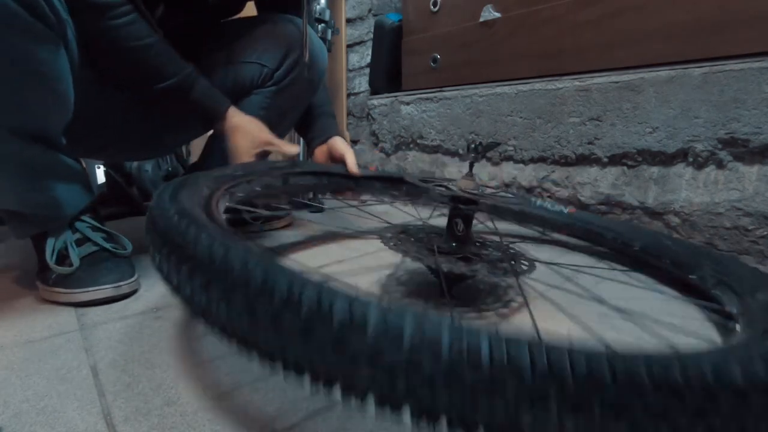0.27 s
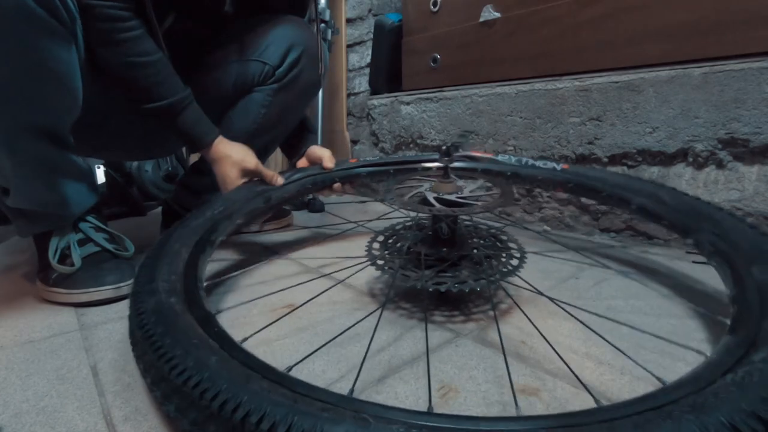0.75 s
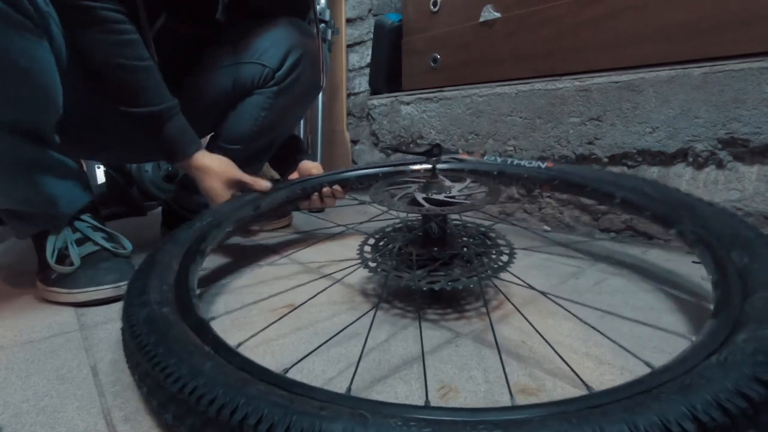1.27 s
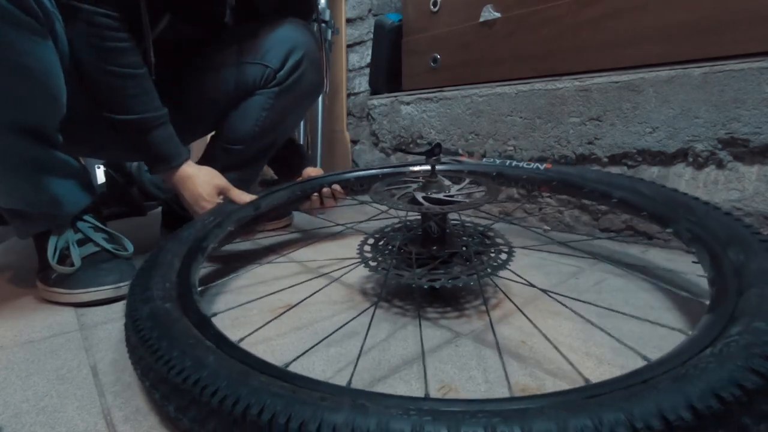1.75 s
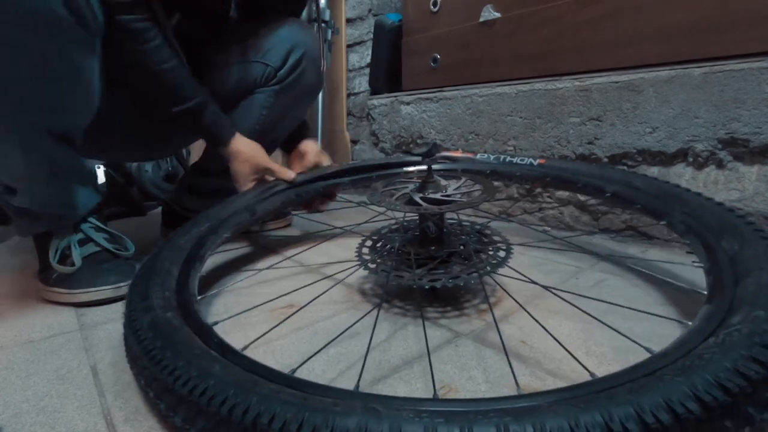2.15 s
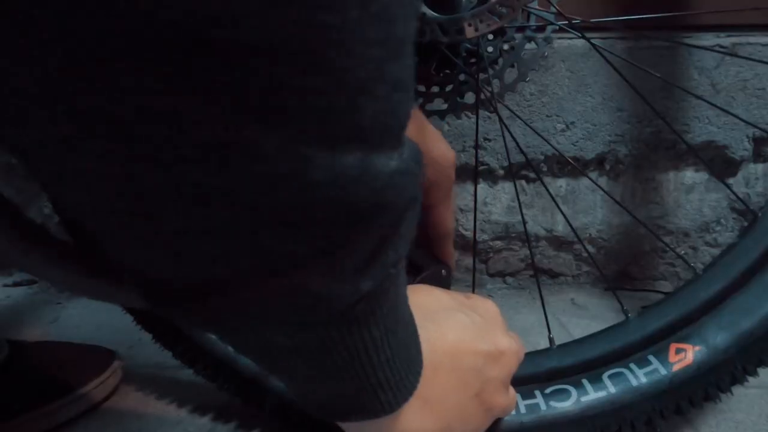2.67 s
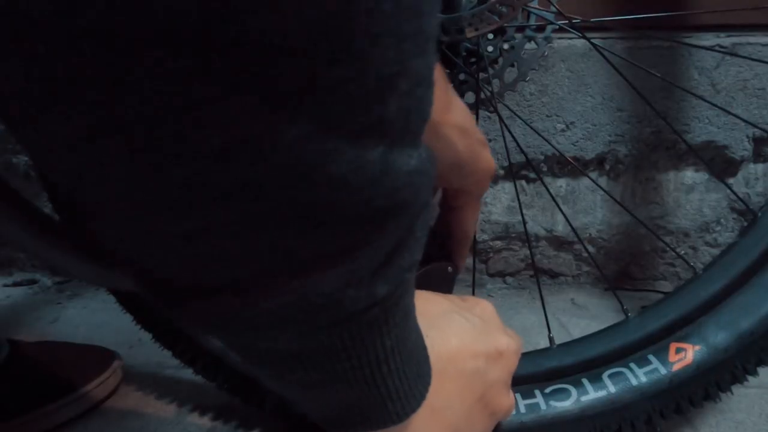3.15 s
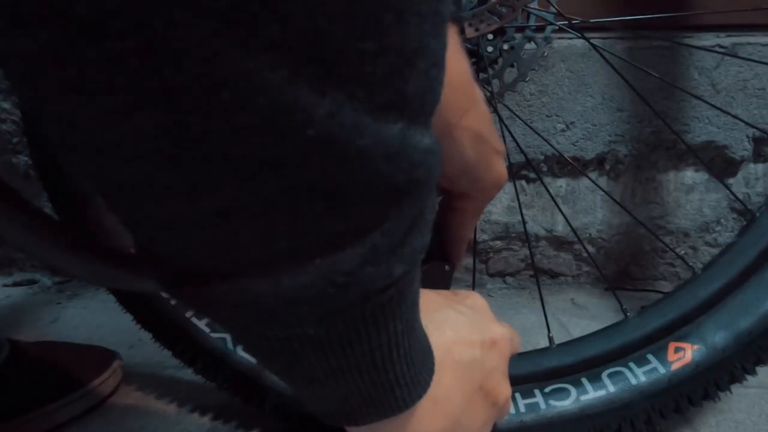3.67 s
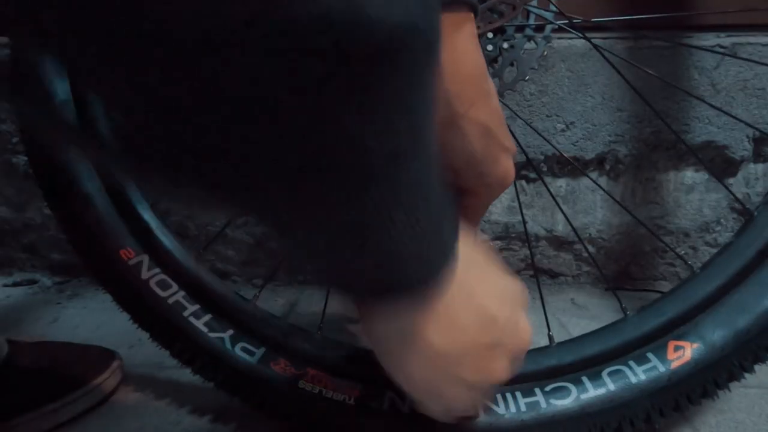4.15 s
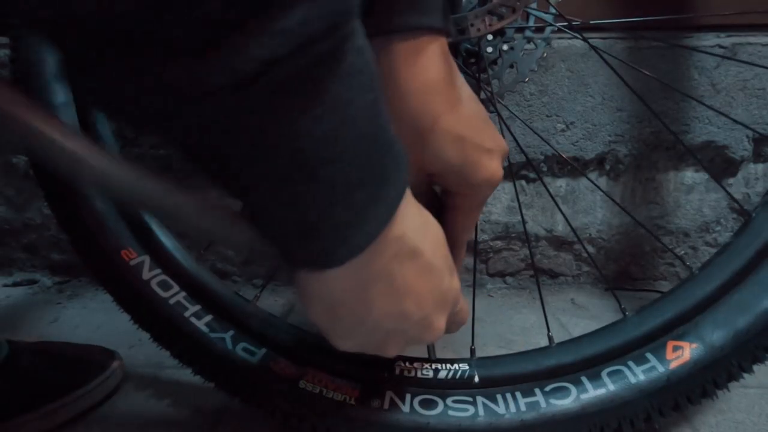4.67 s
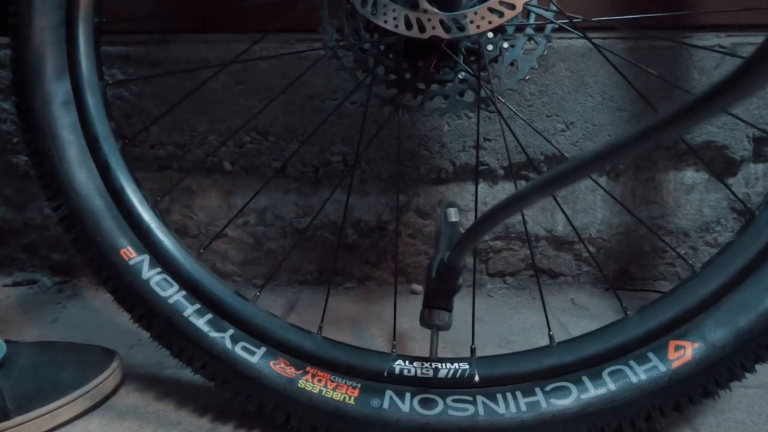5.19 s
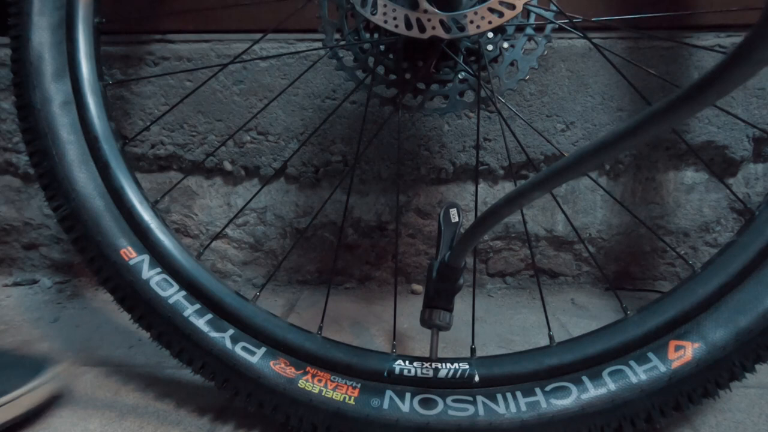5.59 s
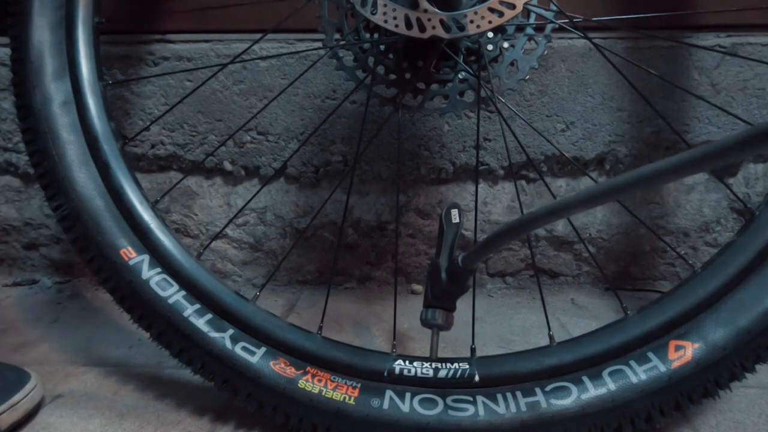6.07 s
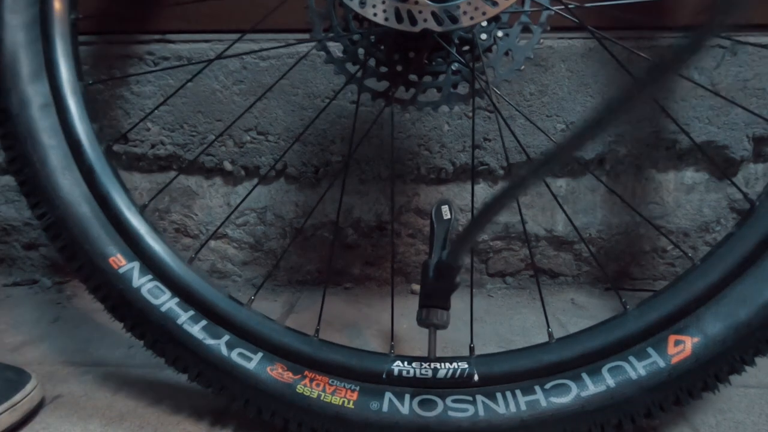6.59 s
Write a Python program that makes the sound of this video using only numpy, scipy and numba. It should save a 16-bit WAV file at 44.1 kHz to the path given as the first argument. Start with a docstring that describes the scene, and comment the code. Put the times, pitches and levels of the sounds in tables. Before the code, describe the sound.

Close up in a quiet, hard-walled corner, hands softly rub a bicycle tyre while its bead creaks in jerks over the rim. A thumb squeaks briefly on rubber. Small dry valve clicks follow in a quick uneven run, then a spoke faintly rings. Finally a hand pump clatters with hollow knocks, air rushes and sliding, ending in a short seal squeak.

```python
"""Low by a stone wall on a tiled floor, two close microphones on a bicycle tyre being worked onto its rim.
First faint room air and hands rubbing rubber: noise of small catches; the bead creaks in jerks, low thumps sag.
A thumb squeaks by stick and slip; then the valve fitting clicks on paired modes and a touched spoke rings.
Last the hand pump: speed-driven air and sliding noise, knocks on shell and barrel with low thumps under them,
and squeaks of its seal."""
import sys
import numpy as np
from scipy import signal
from scipy.fft import rfft, irfft, next_fast_len
from scipy.io import wavfile
from scipy.ndimage import uniform_filter1d
from numba import njit

SR = 44100
rng = np.random.default_rng(int(sys.argv[2]) if len(sys.argv) > 2 else 0)


def to_wav(s):
    """Save 16-bit WAV."""
    ch = np.atleast_2d(s).T  # columns
    pcm = np.round(np.clip(ch, -1, 1) * 32767)  # PCM
    wavfile.write(sys.argv[1], SR, pcm.astype(np.int16))


N = 301203
TIME = np.arange(N) / SR

# reflections off floor and walls: delay_s, level_db
ECHOES = [(.0028, -22.5), (.009, -25), (0.027, -29)]
# treble response of the recorder: freq_hz, gain_db
RECORDER_RESPONSE = [(10200, 0), (11500, -12), (15000, -18), (16000, -28)]
ROOM_T60_S = 0.14
TOP_HZ = 16000
SHADE_HZ = 600  # the recorder's body shades one side above about here

# spectrum of the still air: freq_hz, level_db
QUIET_SPECTRUM = [(20, 0), (45, 13), (90, -16), (155, 7), (260, 4), (700, 1.5), (2000, -15.5), (5000, -20),
                  (10000, -24.5), (15000, -16)]
# level of the faint low hum: time_s, level_db
HUM_LEVEL = [(1.9, -77), (2.3, -69), (4.0, -65), (4.6, -68)]
QUIET_DB, HUM_HZ = -70, 169.0

# a hand slides over the tyre: start_s, length_s, attack_s, scuff_db, hiss_db (dry), rumble_db (casing),
# spot_hz (rubbed spot, as the rub starts), ring_db (of the spot)
RUBS = [(0, 0.15, 0.064, -66, -56.5, -69, 1470, -80), (0.176, 0.078, 0.025, -65.5, -60.5, -89, 2800, -69),
        (0.248, 0.17, 0.041, -63, -57.5, -89, 360, -68.5), (0.512, 0.44, 0.12, -64, -61.5, -65, 1010, -62),
        (0.94, 0.11, 0.014, -74, -73.5, -92, 990, -74), (1.128, 0.2, 0.035, -66.5, -69, -69, 1400, -72),
        (1.326, 0.1, 0.02, -65.5, -63, -72, 454, -69), (1.632, 0.16, 0.032, -63.5, -71, -73, 1650, -70.5),
        (1.848, 0.091, 0.0053, -70, -97, -64.5, 380, -71), (1.906, 0.58, 0.13, -63.5, -62, -70, 1550, -72),
        (2.063, 0.052, 0.0084, -81, -51, -81, 1500, -64), (2.108, 0.068, 0.025, -75, -62, -58, 700, -59.5),
        (2.275, 0.07, 0.065, -61, -50.5, -60, 1500, -57), (2.458, 0.05, 0.0067, -57, -57, -48, 840, -60.5),
        (2.577, 0.091, 0.0038, -86, -57, -60, 860, -75), (2.811, 0.42, 0.0067, -91, -72, -67, 1390, -75),
        (3.41, 0.99, 0.027, -69, -75, -65.5, 836, -73.5), (4.195, 0.2, 0.017, -61.5, -63, -77, 1690, -66),
        (4.41, 0.19, 0.013, -65.5, -71, -69, 665, -70.5), (4.649, 0.18, 0.024, -57, -94, -70, 1290, -67)]
# the fingers hold the tyre: start_s, length_s
GRIPS = [(0, 0.56), (0.564, 1.74), (2.454, 0.313), (2.806, 1.93)]
# spectra of dry hiss, scuffing and casing rumble: freq_hz, level_db
HISS_SPECTRUM = [(900, -16), (2000, -3.5), (2900, 0), (5000, -9), (10000, -16), (11500, -18.5),
                 (15500, -14)]
SCUFF_SPECTRUM = [(180, -5), (350, 8), (480, -2.5), (750, 7), (1500, 4.5), (2200, 0), (3500, -35),
                  (8000, -65)]
CASING_SPECTRUM = [(20, -35), (50, -10), (95, -16), (135, 5.5), (160, 4), (200, -5.5), (270, -9),
                   (500, -19.5), (1200, -59)]
# resonances of the rubber: freq_hz, width_hz, gain_db
RUBBER = [(910, 800, 3.5), (2010, 890, 11), (2980, 300, -32), (4720, 590, -1)]
RUB_ATTACK_S, RUB_RELEASE_S = 0.0081, 0.02  # attack where none is listed
GRIP_SCUFF_DB, GRIP_HISS_DB, GRIP_RUMBLE_DB = -74, -78.5, -78.5  # fingers that only hold the tyre
PRESSURE_WAVER_DB, PRESSURE_WAVER_RATE_HZ = 1.3, 14
RUB_GLIDE_OCTAVES, RUB_OVERTONE = -0.24, 1.6  # pitch sinks along a rub; ratio of the upper resonance
GRIT_PER_S, GRIT_SPREAD_DB = 500, 2
TYRE_GRIT_DB, PUMP_GRIT_DB = -14, -10  # against the scuff and the sliding
SCUFF_FLUTTER_DB, RUMBLE_FLUTTER_DB, JET_FLUTTER_DB = 3, 3, 1.1

# single jerks of the bead; the last row is the dull part of a valve click: start_s, peak_db, fade_s
JERKS = [(0.133, -51, .004), (0.596, -39, 0.00076), (0.606, -31.5, 0.0013), (0.617, -49, .003),
         (1.201, -51, 0.013), (1.382, -48, 0.0022), (1.398, -49, .002), (1.422, -57, .003),
         (1.503, -57, 0.0018), (1.627, -47, 0.0039), (1.849, -50, 0.0036), (2.036, -45.5, 0.0012),
         (2.461, -49.5, 0.0015), (2.486, -48, 0.0036), (2.503, -49, 0.0018), (2.519, -50, .002),
         (2.835, -48, 0.00075)]
# the bead creaks over the rim in a run of jerks: time_s, rate_per_s, peak_db
CREAK = [(.683, 145, -41), (0.706, 65.6, -39.5), (0.748, 36.6, -35), (0.854, 41, -35), (.882, 75, -33),
         (0.933, 34.6, -40)]
# resonances of tyre wall and rim: freq_hz, width_hz, gain_db
BEAD = [(827, 150, 1), (982, 125, 3), (1180, 215, 3), (1500, 120, 0.5), (1850, 205, 1), (2175, 200, 0),
        (2350, 88, -2.5), (2770, 92, -10), (3550, 2800, -9)]
JERK_FADE_S = .005  # within the run

# low thumps, first of the pressed tyre, later under the knocks of the pump: # start_s, peak_db, pitch_hz (mid-
# sag), rise_s
THUMPS = [(0.585, -28, 453, 0.00057), (.590, -67, 188, 0.0066), (.829, -39.5, 198, 0.0017),
          (1.375, -43.5, 189, 0.006), (1.39, -47.5, 113, 0.0037), (1.497, -57, 298, 0.0046),
          (1.848, -58.5, 255, 0.0027), (2.36, -51.5, 148, 0.009), (2.459, -42.5, 271, 0.00315),
          (2.475, -52, 172, 0.0036), (2.528, -42, 135, 0.014), (2.575, -43, 123, 0.012),
          (4.485, -44, 118, 0.0021), (4.672, -30.5, 156.3, 0.0016), (5.343, -29.5, 212, 0.0026),
          (5.754, -15.5, 168, 0.0026), (5.78, -34, 132, 0.0084), (5.93, -39.5, 170, 0.011),
          (6.453, -35, 147, 0.0031), (6.708, -33, 200, 0.0043), (6.754, -30, 142, 0.0046),
          (6.788, -31, 188, 0.0051)]

# a thumb squeaks on the rubber, one list a squeak: time_s, slip_rate_hz, level_db
THUMB_SQUEAKS = [
    [(2.057, 577, -43.5), (2.069, 764, -38), (2.095, 1085, -41.5), (2.109, 831, -41), (2.122, 552, -45)],
    [(2.311, 408, -50), (2.324, 500, -42), (2.340, 758, -47.5), (2.347, 815, -67)],
]

# the valve fitting clicks: start_s, level_db, ring_db (against level_db), ring_hz (middle of the pair)
CLICKS = [(2.807, -51, -1, 3670), (2.836, -28, -3.5, 1790), (2.8505, -33.5, 7, 3400),
          (2.932, -26.5, 0.5, 3650), (2.9827, -29, 1.5, 3750), (3.0398, -30.5, 4, 3670),
          (3.0841, -26.5, 1, 3580), (3.1311, -25, 1, 3530), (3.1819, -25, -3.5, 3640),
          (3.258, -56, 7.5, 2920), (3.301, -25.5, -4, 3400), (3.441, -26.5, -8, 3740),
          (3.5586, -26, -20, 4050), (3.6444, -27, -5.5, 4100), (3.7723, -25.5, -9, 3750),
          (3.9743, -27, -7.5, 3760), (4.2213, -44, 3, 3220), (4.6093, -28.5, -1.5, 2870)]
# resonances of the fitting: freq_hz, width_hz, gain_db
FITTING = [(373, 85, 14), (480, 360, -38), (1320, 510, 5.5), (2060, 180, 3.5), (2960, 790, 7.5),
           (3430, 360, 16), (5870, 1360, 9), (8940, 1000, -9), (13200, 14000, 5)]
CLICK_SPLIT, CLICK_SPREAD = .09, .015  # modes lie this share either side; spread from click to click
CLICK_RING_S, CLICK_TREBLE_DB = .00019, 2

# a spoke is brushed or jolted: start_s, zing_peak_db, touch_fade_s, hum_hz, hum_db
SPOKE_TOUCHES = [(3.07, -66, 0.0017, 350, -56), (4.408, -45, 0.011, 590, -54.5),
                 (4.95, -54, 0.0052, 362.5, -49.5), (4.989, -49, 0.0086, 1480, -58)]
# ring of the spoke and wheel: freq_hz, width_hz, gain_db
SPOKE = [(910, 20, -1), (1550, 12, -4), (1998, 24, 6), (2480, 14, -3), (2770, 11, -16), (3846, 20, -4),
         (4300, 19, -20), (7160, 24, -9.5), (9700, 17, -29)]
SPOKE_T60_S, SPOKE_FLUTTER_DB = .8, 4

# pump strokes: start_s, length_s, fastest (share of the stroke), air_db, sliding_db,
# jet_hz (pitch of the jet at full speed)
STROKES = [(4.913, 0.14, 0.57, -51, -50, 2900), (5.036, 0.74, 0.13, -47.5, -53.5, 3600),
           (5.514, 0.32, 0.42, -43, -48.5, 5600), (5.68, 0.066, 0.49, -45.5, -65, 3660),
           (5.776, 0.1, 0.35, -58, -46.5, 2900), (5.878, 0.21, 0.18, -45.5, -53, 5530),
           (5.975, 0.27, 0.42, -49, -48, 3640), (6.237, 0.12, 0.27, -54, -60, 3000),
           (6.385, 0.16, 0.93, -48, -54, 3750), (6.707, 0.24, 0.71, -72, -49, 3000)]
# spectra of the air rush, the sliding piston and the barrel's rumble: freq_hz, level_db
RUSH_SPECTRUM = [(900, -32), (2000, -4), (2900, 5.5), (4000, 3), (5100, -1.5), (7800, -3.5), (10000, -7.5),
                 (11500, -6), (15500, -6)]
SLIDING_SPECTRUM = [(200, 12), (320, 9), (460, 9), (620, 8.5), (900, 8.5), (1300, 10), (1700, 4), (2500, 2),
                    (5000, -22)]
BARREL_SPECTRUM = [(20, -15), (42, -47), (56, 12.5), (75, -3.5), (140, 3), (190, -6.5), (260, -7),
                   (450, -22), (1200, -38.5)]
# level of the barrel's low rumble: time_s, level_db
RUMBLE_LEVEL = [(4.15, -61), (4.4, -64.5), (4.8, -57), (5.35, -51.5), (5.7, -62), (6.0, -52), (6.3, -58),
                (6.62, -67), (6.8, -49)]
# resonances of the hose and pump head: freq_hz, width_hz, gain_db
HOSE = [(2055, 81, 5.5), (2700, 310, -6), (3810, 100, -2.5), (4440, 120, -6.5), (5900, 350, -9.5),
        (7510, 220, -8), (8400, 500, -9.5)]
AIR_POWER, SLIDING_POWER = 1.8, 0.61  # loudness grows as these powers of piston speed
# while the pump is held, a little air seeps and the piston stirs
HELD_FROM_S, HELD_AIR_DB, HELD_SLIDING_DB = 4.77, -63.5, -62
JET_REST_SHARE = 0.49  # pitch of the jet as the piston starts, against full speed
HOSE_RISE, HOSE_DRIFT = .14, .035  # resonances climb with piston speed and wander as the hose bends
HOSE_REFLECTION, HOSE_FLEX = .2, .08  # about the share sent back from the end; drift of standing waves

# the pump knocks: start_s, clack_peak_db, shell_hz, treble_db, push_fade_s, body_db, body_hz,
# swell_s (to the body's peak), pan_db (treble, left minus right)
KNOCKS = [(4.284, -47, 1900, -17, 0.006, -63, 306, 0.0042, 9),
          (4.338, -46.5, 1400, -12, 0.016, -48, 473, 0.0043, 5),
          (4.411, -41, 1890, -21, 0.018, -50, 462, 0.011, 8),
          (4.454, -46.5, 1180, -19, 0.0063, -42.5, 462, 0.0065, 7),
          (4.670, -39.5, 1210, 1.5, .0076, -38.5, 518, 0.0053, 3),
          (4.845, -37, 890, -8, 0.0058, -36.5, 458, 0.0055, 10),
          (4.86, -24, 1190, -38, 0.0058, -29.5, 459, 0.0049, 7),
          (4.93, -57, 1100, -12, .004, -46.5, 500, .003, 4),
          (4.983, -29, 1390, 5.5, 0.014, -63, 514, .0022, 4),
          (5.041, -32, 1050, -0.5, 0.0053, -40.5, 493, 0.0039, 8),
          (5.094, -52, 1100, -8, .004, -43.5, 465, 0.0046, 8),
          (5.172, -42, 1300, -5, 0.0031, -41.5, 490, 0.0032, 6),
          (5.213, -25.5, 1170, 5, 0.0017, -32.5, 490, 0.0061, 12.5),
          (5.220, -28.5, 1000, -22, 0.0035, -38, 616, 0.0036, 12),
          (5.231, -30, 880, -20, 0.0089, -28, 438, 0.0042, 6),
          (5.246, -38, 850, -25, 0.0075, -30, 527, 0.0029, 4),
          (5.294, -38, 970, -20, 0.0023, -35, 490, 0.0022, 5),
          (5.300, -23.5, 1070, -6, 0.0052, -41, 660, .0046, 10),
          (5.331, -31, 1100, -19, 0.0037, -34.5, 596, 0.0019, 6),
          (5.341, -20.5, 1600, -35, 0.0059, -24.5, 480, .0024, 9),
          (5.350, -25, 1470, -20, 0.003, -36.5, 613, 0.0023, 13),
          (5.368, -19.5, 1340, -25, 0.0017, -38.5, 675, 0.0031, 5),
          (5.403, -42, 1000, -12, .0052, -44, 617, 0.0025, 6),
          (5.453, -33.5, 1260, -16, 0.0058, -41, 545, 0.0038, 10),
          (5.537, -44, 1200, -20, .003, -32.5, 400, 0.00082, 4),
          (5.545, -33.5, 1450, -21, 0.011, -39.5, 448, 0.01, 9),
          (5.737, -30.5, 2150, -9, 0.0074, -45, 490, 0.0031, 14),
          (5.744, -29, 1420, -3, 0.0077, -33.5, 550, 0.0062, 13),
          (5.7525, -11.5, 2030, -31, 0.0014, -14.5, 473, 0.0023, 6.5),
          (5.7562, -21, 2240, -20, 0.0026, -16, 568, 0.0036, 5),
          (5.817, -33, 1010, -28, .0015, -39.5, 905, 0.0053, 8),
          (5.879, -36.5, 1010, -12, .0045, -40, 605, 0.0037, 9),
          (5.91, -29, 1770, 2.5, 0.015, -31, 618, 0.0041, 7),
          (6.038, -28.5, 2130, -24, .0044, -38, 450, 0.0077, 6.5),
          (6.1423, -15.5, 2350, -27, 0.0025, -11.5, 486, 0.0029, 6.5),
          (6.162, -42, 1630, -10, .012, -29, 540, 0.0035, 1),
          (6.18, -35.5, 2800, -11, 0.0036, -47, 500, 0.0023, -1),
          (6.261, -39.5, 2360, -6, .002, -49, 596, 0.0039, 6),
          (6.283, -50, 920, 5, 0.0063, -37, 543, 0.0032, 4),
          (6.3938, -24, 2630, -26, 0.0024, -28, 587, 0.0029, 7),
          (6.4735, -32.5, 3700, -4, 0.0017, -45, 623, 0.0055, 6),
          (6.7053, -26.5, 870, -36, 0.011, -29.5, 397, 0.004, 8),
          (6.7859, -17.5, 1620, -38, 0.0024, -30, 698, 0.004, 8),
          (6.794, -33.5, 1680, -24, 0.0035, -42, 600, .002, 1),
          (6.803, -31, 1690, -20, .005, -41, 510, .003, 5),
          (6.820, -37, 1630, -15, 0.0031, -45, 610, .002, 5)]
# resonances of the pump's shell: freq_hz, width_hz, gain_db
PUMP_SHELL = [(894, 18.5, 27.5), (1078, 62, 22.5), (1270, 210, 14.5), (1587, 126, 23), (2330, 85, -7),
              (2640, 54, 18), (3170, 41, 17.5), (4450, 300, -49), (7060, 1200, -61), (9500, 1500, -7)]
# modes of the pump barrel: freq_hz, level_db, t60_s
PUMP_MODES = [(180, -21, .07), (304, -28, 0.11), (360.5, 6.5, 0.12), (448, 6.5, 0.039), (514, -3, 0.069),
              (635, 8, 0.055), (772, 5, 0.073), (990, 7, 0.047)]
AFTER_RING_DB, RECOIL_DB = -4.5, -8.5  # against the body swing
SHELL_SPREAD = 0.0333  # spread of the shell's pitch from blow to blow
# loose parts chatter after a knock: level against the clack, fade, spread of the taps' sizes
CHATTER_DB, CHATTER_S, CHATTER_SPREAD_DB = -25, 0.028, 7
SLACK_S, SLACK_DB = 0.011, -31.5  # a light touch takes up slack: lead time, level against the clack

# the piston seal squeaks, one list a squeak: time_s, slip_rate_hz, level_db
SEAL_SQUEAKS = [
    [(6.473, 1630, -40), (6.476, 1625, -36.5), (6.488, 1550, -51)],
    [(6.490, 1350, -46), (6.498, 1464, -30), (6.508, 1575, -30), (6.517, 1565, -43)],
    [(6.786, 1790, -64), (6.792, 1697, -60), (6.811, 1604, -37), (6.827, 1800, -44)],
]
# resonances of the seal: freq_hz, width_hz, gain_db
SEAL = [(760, 320, 10.5), (1730, 340, 12.5), (2800, 50, 8.5), (3800, 39, 11.5), (5800, 500, -3)]


def amp(db):
    """Decibels to gain."""
    return 10 ** (np.asarray(db) / 20)


def unit(x):
    """Scale to rms 1."""
    return x / np.sqrt(np.mean(x ** 2) + 1e-20)


def at_peak(x, db):
    """Scale a short sound so that its loudest millisecond swings to this level."""
    return x * amp(db) / np.sqrt(2 * uniform_filter1d(x ** 2, size=44).max())


def add(track, start, sound):
    """Mix a sound into a track at a time in seconds."""
    i = max(0, min(int(start * SR), N - 1))
    track[..., i:i + sound.shape[-1]] += sound[..., :N - i]


def colour(x, points):
    """Shape a sound with a (Hz, dB) spectrum, interpolated over log frequency."""
    hz, db = np.transpose(points)
    size = next_fast_len(x.shape[-1])
    bins = np.maximum(np.fft.rfftfreq(size, 1 / SR), 1)
    gain = amp(np.interp(np.log(bins), np.log(np.maximum(hz, 1)), db))
    return irfft(rfft(x, size) * gain, size)[..., :x.shape[-1]]


def resonate(x, resonances):
    """Drive parallel resonances of (Hz, width, dB)."""
    return sum(amp(db) * signal.lfilter(*signal.iirpeak(min(hz, SR / 2 - 1), hz / width, SR), x)
               for hz, width, db in resonances)


def brighten(x, treble_db, corner_hz=4500):
    """Lift or dull what lies above a gentle corner, as harder or softer contact does."""
    low = signal.lfilter(*signal.butter(1, min(corner_hz, SR / 2 - 1), fs=SR), x)
    return low + amp(treble_db) * (x - low)


def confine(x, low_hz, high_hz):
    """Steep skirts below and above the band in which an object radiates."""
    edges = np.clip([low_hz, max(high_hz, 2 * low_hz)], 1, SR / 2 - 1)
    return signal.sosfilt(signal.butter(3, edges, "band", fs=SR, output="sos"), x)


def walk(rate):
    """Slow chance with a spread near 1, taking this many new values a second."""
    knots = rng.standard_normal(1024)
    return np.interp(TIME * rate, np.arange(len(knots)), knots)


def contact(length, chatter, swell_s=0.00013):
    """A first touch, then small contacts that swell and die away."""
    t = TIME[:SR // 4]
    push = chatter * rng.standard_normal(len(t)) * np.exp(-t / max(length, 1 / SR)) * (1 - np.exp(-t / swell_s))
    push[0] += 1
    return push


def friction(spectrum, grain_db, flutter_db, width, width_hz):
    """Tiny catches of uneven size; the treble differs between left and right, the bass does not."""
    catches = amp(grain_db * np.repeat(rng.standard_normal(N // 64 + 1), 64)[:N])
    mid, side = unit(colour(rng.standard_normal((2, N)) * catches, spectrum))
    side = signal.lfilter(*signal.butter(1, min(width_hz, SR / 2 - 1), "high", fs=SR), side)
    stereo = unit(mid + width * np.array([side, -side]))
    return stereo * amp(flutter_db * walk(45))


def grit(resonances):
    """Sparse little catches of uneven size tick on a body; rms 1."""
    sizes = amp(GRIT_SPREAD_DB * rng.standard_normal(N))
    return unit(resonate(sizes * (rng.random(N) < GRIT_PER_S / SR), resonances))


@njit
def sweep(x, hz, q):
    """A band-pass whose centre moves from sample to sample."""
    y, band, low = np.empty(len(x)), 0., 0.
    for i in range(len(x)):
        g = np.tan(np.pi * min(hz[i], .45 * SR) / SR)
        v = (band + g * (x[i] - low)) / (1 + g * (g + 1 / q))
        band, low, y[i] = 2 * v - band, low + 2 * g * v, v / np.sqrt(g)
    return y


def gliding_band(gains, pitches, q):
    """Noise in a resonance whose pitch leans to that of the strongest gesture; rms 1."""
    weights = gains ** 2 + 1e-20
    centre_hz = np.sum(weights * pitches, axis=0) / np.sum(weights, axis=0)
    return unit(sweep(rng.standard_normal(N), centre_hz, float(q)))


def swell(start, length, attack_s=RUB_ATTACK_S):
    """A gesture sets in, holds and dies away."""
    rise = np.clip((TIME - start) / attack_s, 0, 1)
    return rise * np.exp(-np.maximum(TIME - start - length, 0) / RUB_RELEASE_S)


def together(gains, levels_db, rest_db):
    """Overlapping gestures add in power over a resting level."""
    return np.sqrt(amp(levels_db) ** 2 @ gains ** 2 + amp(rest_db) ** 2)


def shade(x, pan_db):
    """The recorder's body shades only the shorter waves: left and right."""
    left, right = np.broadcast_to(x, (2, x.shape[-1]))
    return np.array([brighten(left, pan_db / 2, SHADE_HZ), brighten(right, -pan_db / 2, SHADE_HZ)])


def place(x, pan_db, lag_s, room_db):
    """Two close microphones hear the direct sound, near reflections and a short diffuse tail."""
    t = TIME[:SR // 2]
    noise = rng.standard_normal((2, len(t)))
    tail = noise * np.exp(-np.log(1000) * t / ROOM_T60_S) * (1 - np.exp(-t / 0.00077))
    mid = colour(tail[0], [(100, 2.5), (2000, 3.0), (6000, -2.0), (14000, -2.5)])
    side = colour(tail[1], [(100, -43), (400, -11.5), (1000, 6.0), (6000, -2.0), (14000, 5.0)])
    response = amp(room_db) * (mid + np.array([side, -side])) / np.sqrt(np.sum(mid ** 2))
    response[:, 0] += 1  # direct sound
    for delay, db in ECHOES:
        response[:, int(delay * SR)] += amp(db)
    left, right = shade(signal.fftconvolve(np.atleast_2d(x), response, axes=1)[:, :N], pan_db)
    return np.array([left, np.roll(right, round(lag_s * SR))])


def squeaks(glides, resonances, jitter, scatter_db, rasp):
    """Stick and slip: a train of slightly uneven releases drives the resonances."""
    out = np.zeros(N)
    for glide in glides:
        s, hz, db = np.transpose(sorted(glide))
        t = TIME[:max(int((s[-1] - s[0]) * SR), 256)] + s[0]
        chance = rng.standard_normal((512, 2))  # timing and size of each release
        cycles = np.cumsum(np.interp(t, s, hz)) / SR
        cycles += np.interp(cycles, np.arange(512), jitter * np.cumsum(chance[:, 0]))
        sizes = amp(scatter_db * chance[cycles.astype(int) % 512, 1])
        slips = np.diff(np.floor(cycles), prepend=0) * sizes
        voice = unit(resonate(slips + rasp * rng.standard_normal(SR)[:len(t)], resonances))
        add(out, s[0], voice * amp(np.interp(t, s, db)) * signal.windows.tukey(len(t), .06))
    return out


def background():
    """Still air with a faint low hum, noise through a twice-applied resonance, that wavers."""
    resonance = [(HUM_HZ, 26, 0)]
    hum = unit(resonate(resonate(rng.standard_normal(N), resonance), resonance))
    hum_db = np.interp(TIME, *np.transpose(HUM_LEVEL))
    air = friction(QUIET_SPECTRUM, grain_db=1.0, flutter_db=-7.5, width=1.0, width_hz=99)
    return amp(QUIET_DB) * air + amp(hum_db) * hum


def hands():
    """Skin and cloth slide and catch on rubber, which rumbles under them; the pressure wavers."""
    start, length, attack, scuff_db, hiss_db, rumble_db, spot_hz, ring_db = np.transpose(RUBS)
    rubs = np.array([swell(*rub) for rub in zip(start, length, attack)])
    pitches = np.array([np.interp(TIME, [s, s + held], [hz, hz * 2 ** RUB_GLIDE_OCTAVES])
                        for s, held, hz in zip(start, length, spot_hz)])
    rings = rubs * amp(ring_db)[:, None]
    spot = gliding_band(rings, pitches, q=5.2)
    spot = spot + amp(-9.5) * gliding_band(rings, pitches * RUB_OVERTONE, q=4.5)
    waver = amp(PRESSURE_WAVER_DB * walk(PRESSURE_WAVER_RATE_HZ))
    pressure = sum(swell(s, held) for s, held in GRIPS) * waver
    hiss = pressure * together(rubs, hiss_db, GRIP_HISS_DB)
    scuff = pressure * together(rubs, scuff_db, GRIP_SCUFF_DB)
    rumble = pressure * together(rubs, rumble_db, GRIP_RUMBLE_DB)
    ring = pressure * together(rubs, ring_db, -94)
    ring = ring * confine(spot, low_hz=258, high_hz=3230) * amp(3.8 * walk(70))
    hiss_noise = friction(HISS_SPECTRUM, grain_db=2.0, flutter_db=2.5, width=1.0, width_hz=6500)
    scuff_noise = friction(SCUFF_SPECTRUM, grain_db=2.0, flutter_db=SCUFF_FLUTTER_DB, width=0.95, width_hz=460)
    ticks = confine(grit(RUBBER), low_hz=810, high_hz=2720)
    casing = friction(CASING_SPECTRUM, grain_db=1.5, flutter_db=RUMBLE_FLUTTER_DB, width=0.55, width_hz=600)
    return (ring + hiss * amp(-0.46) * hiss_noise + scuff * amp(1.5) * scuff_noise
            + scuff * amp(TYRE_GRIT_DB) * ticks + rumble * amp(0.5) * casing)


def creak_jerks():
    """The dragged bead lets go each time its tension has built up: rows of start_s, peak_db, fade_s."""
    s, rate, db = np.transpose(CREAK)
    t = TIME[(TIME >= s[0]) & (TIME <= s[-1])]
    tension = np.cumsum(np.interp(t, s, rate)) / SR
    releases = np.interp(np.arange(tension[-1]), tension, t)
    return [(at, np.interp(at, s, db), JERK_FADE_S) for at in releases]


def bead_creak():
    """Jerks of the bead, and the dull part of one valve click, shake resonances of tyre wall and rim."""
    out = np.zeros(N)
    for s, db, fade in JERKS + creak_jerks():
        wall = resonate(contact(fade, chatter=0.06), BEAD)
        # passing the resonances twice makes them swell before they fade
        creak = confine(resonate(wall, BEAD) + amp(-12) * wall, low_hz=635, high_hz=5130)
        add(out, s, at_peak(creak, db))
    return place(out, pan_db=-3.0, lag_s=0, room_db=-9)


def low_thumps():
    """Low thumps of the pressed tyre, later under the pump's knocks: sines swell, sag in pitch and die."""
    out, t = np.zeros(N), TIME[:SR // 4]
    for s, db, hz, rise in THUMPS:
        age = t / max(rise, 1 / SR)
        phase = 2 * np.pi * np.cumsum(hz * (1 + 0.21 * (np.exp(-age / 2) - .5))) / SR
        add(out, s, amp(db) * age * np.exp(1 - age) * np.sin(phase))
    return place(out, pan_db=-2.5, lag_s=0, room_db=-7.5)


def thumb_squeaks():
    """A thumb sticks and slips on the rubber, whose resonances colour the gliding slip rate."""
    rubber = squeaks(THUMB_SQUEAKS, RUBBER, jitter=.03, scatter_db=2, rasp=.012)
    return place(confine(rubber, low_hz=523, high_hz=3170), pan_db=-2.5, lag_s=0, room_db=-16.5)


def valve_clicks():
    """The small fitting snaps: a brief, dry pair of modes, a bright tick and a dull tap into the rim."""
    rings, ticks, t = np.zeros(N), np.zeros(N), TIME[:SR // 4]
    age = t / CLICK_RING_S
    for s, db, ring_db, hz in CLICKS:
        low, high, body = 1 + CLICK_SPREAD * rng.standard_normal(3)
        pair = np.sin(2 * np.pi * hz * (low - CLICK_SPLIT) * t)
        pair = pair + np.sin(2 * np.pi * hz * (high + CLICK_SPLIT) * t)
        fitting = [(f * body, width, gain) for f, width, gain in FITTING]
        tick = brighten(resonate(contact(0.0023, chatter=0.2), fitting), CLICK_TREBLE_DB)
        tap = confine(contact(0.0093, chatter=0.06), low_hz=220, high_hz=710)
        add(rings, s, at_peak(age ** 2 * np.exp(-age) * pair, ring_db + db))
        add(ticks, s, amp(db) * (at_peak(tick, db=-4.5) + at_peak(tap, db=-23)))
    rings = place(rings, pan_db=-0.5, lag_s=0, room_db=-15)
    return rings + place(ticks, pan_db=-0.5, lag_s=0, room_db=-9)


def spoke_rings():
    """A brushed or jolted spoke zings briefly and hums on, its pitch wavering under the hand."""
    out, t = np.zeros(N), TIME[:SR]
    for s, db, fade, hum_hz, hum_db in SPOKE_TOUCHES:
        zing = resonate(contact(fade, chatter=0.21), SPOKE)
        cycles = np.cumsum(hum_hz * (1 + 0.04 * walk(60)[:len(t)])) / SR
        envelope = (1 - np.exp(-t / 0.0034)) * np.exp(-np.log(1000) * t / SPOKE_T60_S)
        hum = np.sin(2 * np.pi * cycles) * envelope
        add(out, s, at_peak(zing, db))
        # the hand keeps damping the hum
        add(out, s, amp(hum_db + SPOKE_FLUTTER_DB * walk(47)[:len(t)]) * hum)
    return place(out, pan_db=-8.5, lag_s=0, room_db=-5.5)


def piston_speed(start, length, fastest):
    """The piston speeds up from rest and slows to rest again; 1 at its fastest."""
    turns = start + length * np.array([0, np.clip(fastest, .05, .95), 1])
    travel = np.interp(TIME, turns, [0, .5, 1])
    return 4 * travel * (1 - travel)


def stroke_levels():
    """Piston speed sets how strongly the air rushes and the seal rubs, and how high the jet whistles."""
    start, length, fastest, air_db, sliding_db, jet_hz = np.transpose(STROKES)
    speed = np.array([piston_speed(*stroke) for stroke in zip(start, length, fastest)])
    held = swell(HELD_FROM_S, N / SR)
    pitches = jet_hz[:, None] * (JET_REST_SHARE + (1 - JET_REST_SHARE) * speed)
    whistle = gliding_band(speed * amp(air_db)[:, None], pitches, q=1.9)
    rush = held * together(speed ** AIR_POWER, air_db, HELD_AIR_DB)
    sliding = held * together(speed ** SLIDING_POWER, sliding_db, HELD_SLIDING_DB)
    return rush, sliding, whistle, speed.max(axis=0)


def hose_rings(jet, speed):
    """The rushing air excites the hose's resonances, which slide with the piston speed."""
    tuning = 1 + HOSE_RISE * (speed - 1)
    out = 0
    for hz, width, db in HOSE:
        bend = tuning + HOSE_DRIFT * walk(7.8)
        scale = np.sqrt(np.tan(np.pi * min(hz, .45 * SR) / SR)) * width / hz  # evens out the sweep's gain
        out = out + amp(db) * scale * np.array([sweep(side, hz * bend, float(hz / width)) for side in jet])
    return out


def tube(x, spacing_hz, reflection, flex):
    """Sound runs to and fro in a hose; its standing waves drift as the hose flexes."""
    trip = SR / spacing_hz * (1 + flex * walk(4.4))  # samples
    now = np.arange(N)
    out = 0
    for k in range(5):
        earlier = np.clip(np.round(now - k * trip).astype(int), 0, N - 1)
        out = out + (-np.tanh(reflection)) ** k * x[:, earlier]
    return unit(out)


def pump_strokes():
    """Air rushes through the hose while the piston slides in the barrel, which rumbles."""
    rush, sliding, whistle, speed = stroke_levels()
    rumble = amp(np.interp(TIME, *np.transpose(RUMBLE_LEVEL), left=-np.inf))
    jet = friction(RUSH_SPECTRUM, grain_db=-2.5, flutter_db=JET_FLUTTER_DB, width=2.8, width_hz=11800)
    # a harder push makes a brighter jet
    force = np.clip(rush / rush.max(), 0, 1)
    jet = force * brighten(jet, treble_db=-0.5) + (1 - force) * brighten(jet, treble_db=-14.0)
    jet = unit(jet) + amp(-6.5) * whistle
    hose = tube(jet / 2 + hose_rings(jet, speed), spacing_hz=524, reflection=HOSE_REFLECTION, flex=HOSE_FLEX)
    air = rush * amp(-1.0) * hose
    slide = friction(SLIDING_SPECTRUM, grain_db=1.5, flutter_db=0.5, width=1.0, width_hz=1500)
    piston = sliding * amp(-1.0) * slide
    piston = piston + sliding * amp(PUMP_GRIT_DB) * grit(PUMP_SHELL)
    barrel = friction(BARREL_SPECTRUM, grain_db=4.0, flutter_db=RUMBLE_FLUTTER_DB, width=0.22, width_hz=310)
    balance = amp(np.array([[1], [-1]]) * 0.83)  # a little to the left
    return (air + piston) * balance + rumble * amp(2.5) * barrel


def chatter():
    """Loose parts tap the pump's shell unevenly, in a flurry that swells and dies away."""
    t = TIME[:SR // 4]
    sizes = amp(CHATTER_SPREAD_DB * np.repeat(rng.standard_normal(len(t)), 96)[:len(t)])
    taps = resonate(rng.standard_normal(len(t)) * sizes, PUMP_SHELL)
    return unit(taps) * np.exp(-t / CHATTER_S) * (1 - np.exp(-t / 0.029))


def pump_knocks():
    """A blow clacks on the shell and swings the barrel; the hand damps it and the nearest modes ring on."""
    out, t = np.zeros((2, N)), TIME[:SR // 4]
    mode_hz, mode_db, t60 = np.transpose(PUMP_MODES)[:, :, None]
    for s, clack_db, shell_hz, treble_db, fade, body_db, body_hz, swell_s, pan_db in KNOCKS:
        grip = 1 + SHELL_SPREAD * rng.standard_normal()  # the grip changes from blow to blow
        push = contact(fade, chatter=0.57, swell_s=0.15 * fade)
        shell = resonate(push, [(hz * grip, width, db) for hz, width, db in PUMP_SHELL])
        struck_spot = resonate(push, [(shell_hz, 500, 0)])
        clack = brighten(unit(shell) + unit(struck_spot) * amp(1.5), treble_db)
        swing = t / swell_s * np.exp(1 - t / swell_s) * np.sin(2 * np.pi * body_hz * t)
        # modes near the body's pitch ring most
        weight = amp(mode_db) / (1 + (np.log(mode_hz / body_hz) / 0.35) ** 2)
        cycles = mode_hz * t + rng.random(mode_hz.shape)
        modes = weight * np.sin(2 * np.pi * cycles) * np.exp(-np.log(1000) * t / t60)
        ring = np.sum(modes, axis=0) * (1 - np.exp(-t / 0.0004))
        # the whole pump recoils
        shove = np.sin(2 * np.pi * 175 * t) * np.exp(-t / 0.0058) * (1 - np.exp(-t / 0.028))
        body = amp(body_db) * (swing + at_peak(ring, AFTER_RING_DB) + at_peak(shove, RECOIL_DB))
        slack = resonate(contact(0.0066, chatter=0.44), PUMP_SHELL)
        add(out, s, shade(at_peak(clack, clack_db) + body, pan_db))
        add(out, s - SLACK_S, at_peak(slack, clack_db + SLACK_DB))
        add(out, s, amp(clack_db + CHATTER_DB) * chatter())
    return out


def seal_squeaks():
    """The piston's seal sticks and slips in the barrel, faster and rougher than the thumb."""
    seal = squeaks(SEAL_SQUEAKS, SEAL, jitter=.08, scatter_db=3, rasp=.07)
    return shade(confine(seal, low_hz=523, high_hz=5300), pan_db=5.0)


def scene():
    """Tyre work, valve and pump in a quiet, hard-walled corner."""
    thumb = thumb_squeaks()
    seal = seal_squeaks()
    pump = place(pump_knocks() + seal, pan_db=-4, lag_s=.00003, room_db=-14.0)
    tyre = hands() + bead_creak() + low_thumps() + thumb
    wheel = valve_clicks() + spoke_rings()
    return tyre + wheel + pump + pump_strokes() + background()


def record(dry):
    """The recorder dulls the treble and cuts the top."""
    low_pass = signal.ellip(8, .2, 70, TOP_HZ, fs=SR, output="sos")
    return signal.sosfilt(low_pass, colour(dry, RECORDER_RESPONSE))


dry = scene()
out = record(dry)
to_wav(out)
```